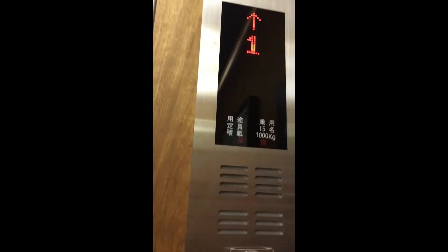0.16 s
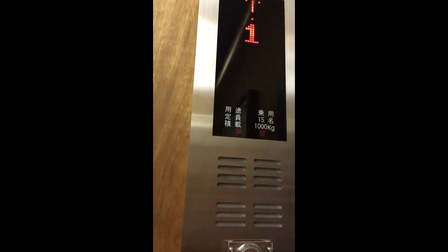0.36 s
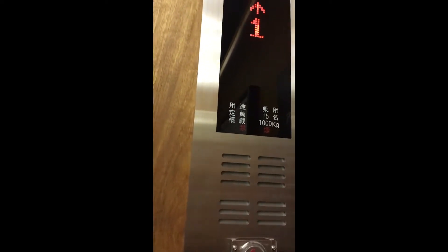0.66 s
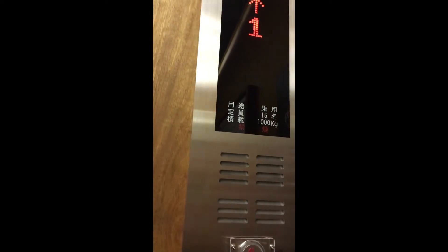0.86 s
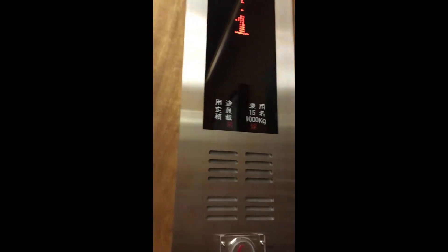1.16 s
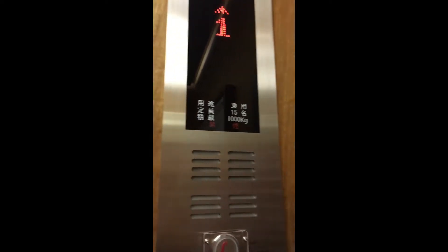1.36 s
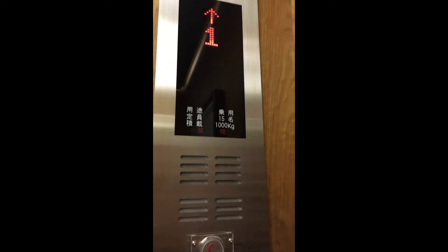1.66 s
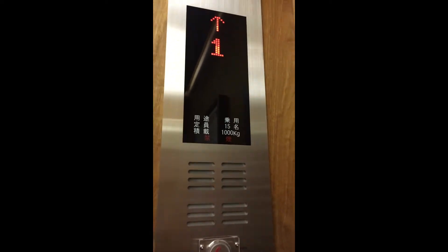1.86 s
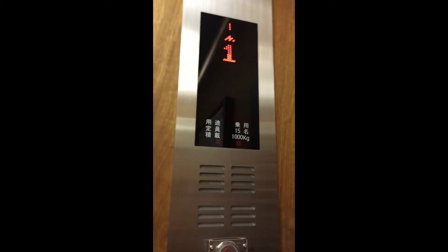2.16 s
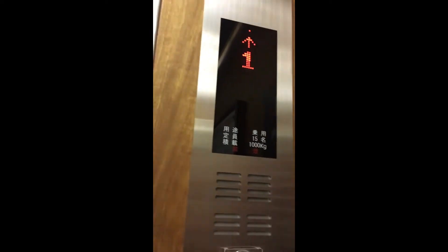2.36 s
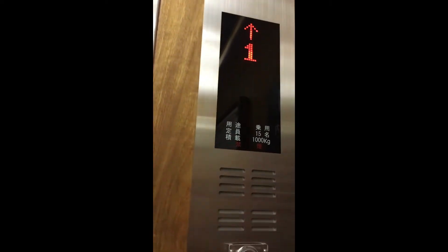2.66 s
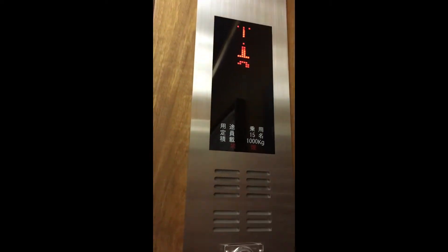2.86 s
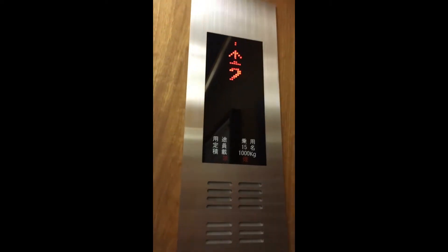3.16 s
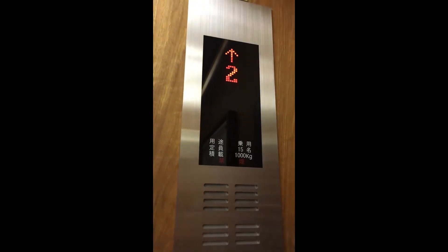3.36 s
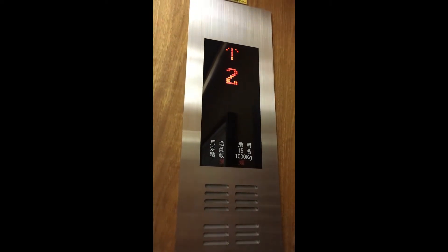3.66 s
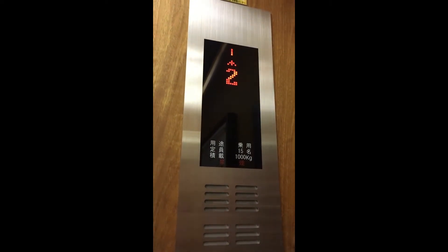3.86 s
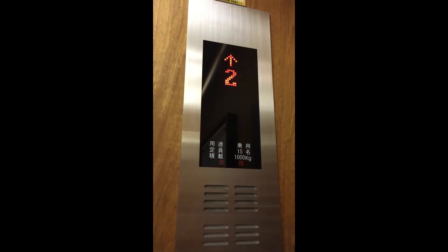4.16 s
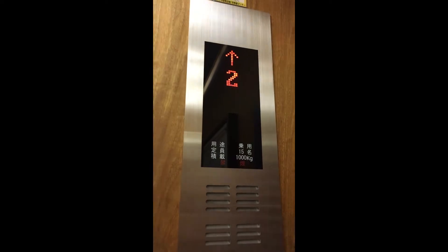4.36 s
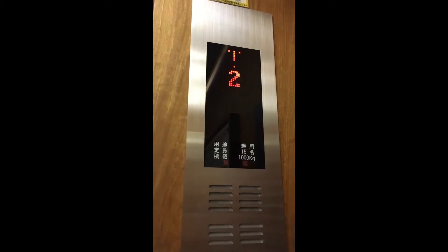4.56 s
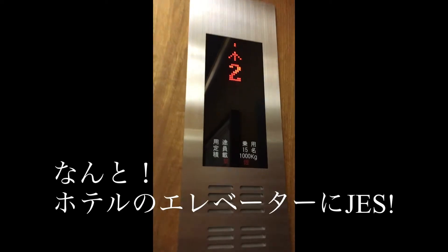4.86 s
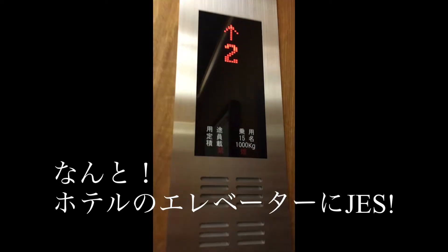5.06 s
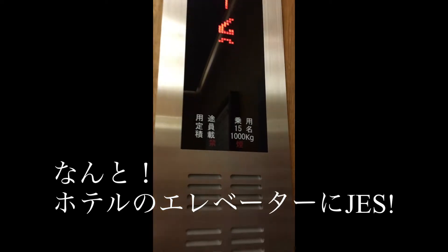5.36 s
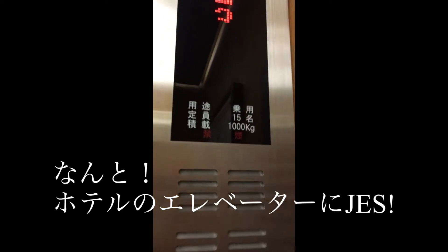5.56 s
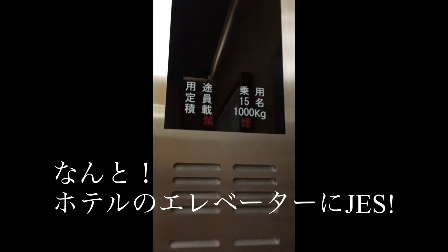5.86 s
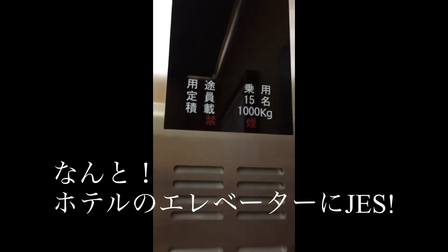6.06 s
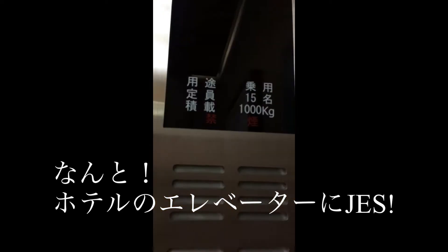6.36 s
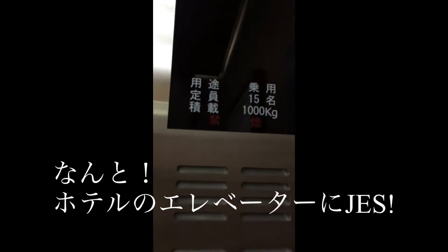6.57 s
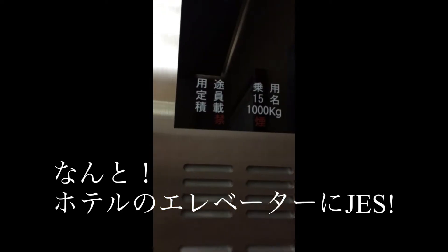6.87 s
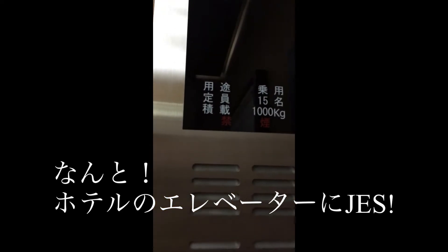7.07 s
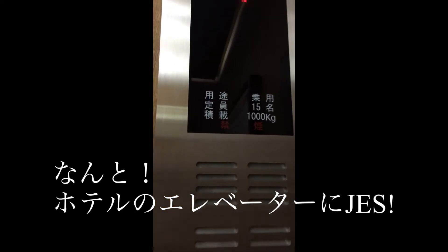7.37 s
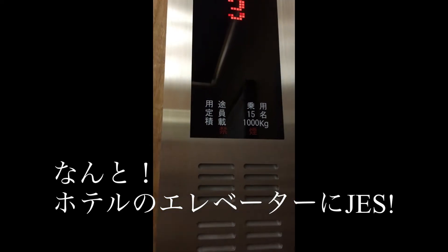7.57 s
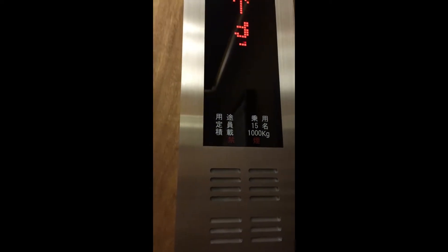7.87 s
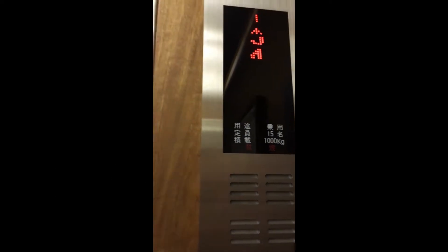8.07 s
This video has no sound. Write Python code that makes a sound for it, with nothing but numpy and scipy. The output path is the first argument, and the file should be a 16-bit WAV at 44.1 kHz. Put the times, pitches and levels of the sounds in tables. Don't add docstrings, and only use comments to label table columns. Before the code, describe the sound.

Close phone microphone inside a small metal lift car moving upward. A quiet, deep rumble wavers throughout under soft fan air. In the first second and a quarter a fingertip raps a button about eight times, short hard clicks with a brief boxy echo. A sleeve rustles softly just before two seconds. Afterwards the ride continues, its wall rattle and rail hum swelling around six to seven seconds.

```python
import sys
import numpy as np
from scipy import signal
from scipy.fft import rfft, irfft, next_fast_len
from scipy.io import wavfile
from scipy.ndimage import uniform_filter1d

SR = 44100
rng = np.random.default_rng(int(sys.argv[2]) if len(sys.argv) > 2 else 0)


def elevation(decibels):
    levels = np.asarray(decibels, float)
    return 10 ** (levels / 20)


def unload_wav(signal):
    wavfile.write(
        sys.argv[1],
        SR,
        np.round(np.clip(np.atleast_2d(signal).T, -1, 1) * 32767).astype(np.int16),
    )


N = 362442

# pitch_hz, width_hz
AIR_MODES = [(81, 10.5), (118, 15.4)]
# peak_s, level_db, half_length_s
LURCHES = [(.11, -38, 0.052), (.34, -43.5, 0.047), (.56, -43, 0.16), (.9, -41.5, .07), (1.1, -39, .1),
           (1.36, -36.5, 0.053), (1.52, -42, 0.072), (1.7, -40, .1), (1.9, -40.5, 0.069),
           (2.2, -40.5, 0.18), (2.6, -45.5, 0.072), (3.02, -41.5, 0.069), (3.13, -41, 0.026),
           (3.45, -42.5, 0.054), (3.63, -40.5, 0.032), (3.85, -37.5, 0.11), (4.12, -43, .08),
           (4.72, -38.5, 0.074), (4.99, -37, 0.077), (5.24, -43, 0.053), (5.6, -41.5, 0.23),
           (5.94, -44.5, .07), (6.16, -39.5, 0.14), (6.42, -38.5, 0.096), (6.75, -38, 0.079),
           (7.0, -43, 0.051), (7.17, -39.5, 0.035), (7.32, -38, 0.093), (7.62, -46, 0.14), (8.08, -43, 0.2)]
# peak_s, level_db, half_length_s
SHUDDERS = [(.11, -40, 0.075), (.5, -42.5, 0.14), (.89, -44, 0.15), (1.25, -44, 0.091), (1.56, -42.5, 0.2),
            (1.85, -46, 0.099), (2.17, -41.5, 0.12), (2.53, -45.5, 0.13), (2.73, -40.5, 0.054),
            (2.92, -41, 0.055), (3.25, -41.5, 0.086), (3.46, -37, 0.033), (3.65, -46, .06),
            (3.87, -40.5, .05), (4.14, -37.5, 0.087), (4.39, -38.5, 0.043), (4.6, -41, 0.19),
            (5.04, -42, 0.13), (5.29, -38.5, 0.048), (5.45, -43.5, .1), (5.85, -43, 0.25),
            (6.07, -43.5, 0.055), (6.33, -44, .07), (6.59, -40.5, 0.083), (6.95, -40.5, 0.13),
            (7.27, -40.5, 0.069), (7.44, -38, 0.051), (7.65, -43, 0.13), (7.85, -42.5, 0.087),
            (8.05, -49, 0.05)]
# pitch_hz, width_hz, level_db
LARGE_PANELS = [(175.8, 18.8, 0), (215.9, 12.3, -5.5)]
# pitch_hz, width_hz, level_db
SMALL_PANELS = [(253.9, 10, 0), (289.9, 11.2, -2.5), (319, 7.9, -6)]
# time_s, level_db
GUIDE_LOAD = [(0, -54.5), (1.2, -53.5), (1.75, -58.5), (2.5, -54), (3.2, -58.5), (3.5, -53.5), (4.1, -57),
              (4.7, -56), (5.25, -55), (5.6, -52.5), (6.04, -46), (6.36, -48), (6.85, -48), (7.15, -50),
              (7.75, -53.5), (8.22, -59)]


def car_body():
    lower_air = even_swells(LURCHES, -56.5) * evened(resonate(*AIR_MODES[0]), 0.081)
    upper_air = even_swells(SHUDDERS, -52.5) * evened(resonate(*AIR_MODES[1]), 0.068)

    load_db, = in_time(GUIDE_LOAD)
    sag_s, sag_half_s = 3.95, 1.16
    sag = np.exp(-0.5 * ((np.arange(N) / SR - sag_s) / sag_half_s) ** 2)
    large_db = -48.5 + 0.37 * (load_db - load_db.mean()) - 1 * sag
    large = elevation(large_db) * evened(mode_cluster(LARGE_PANELS), 0.27)
    small = elevation(load_db) * evened(mode_cluster(SMALL_PANELS), 0.25)
    return lower_air + upper_air + large + small


# pitch_hz, width_hz, level_db
RAIL_STRANDS = [(952, 20, 3), (974, 20, 1.5), (1017, 27, -5.5), (1054.6, 28, -1)]


def guides():
    load_db, = in_time(GUIDE_LOAD)
    hum_db = -58.5 + 0.83 * (load_db - load_db.mean())
    return elevation(hum_db) * mode_cluster(RAIL_STRANDS)


# start_s, peak_db, brightness_db, plate_ring_db
RAPS = [
    (0.127, -46, -21, 3),
    (0.326, -52, -26, -3),
    (0.383, -31, -23, 1.5),
    (0.5631, -35, -20, 5),
    (0.7273, -32, -21.5, 1.5),
    (0.896, -31, -20.5, -0.5),
    (1.0745, -31.5, -20, 2),
    (1.2455, -38.5, -26, -11),
    (6.833, -70, 1, 14),
]
# pitch_hz, level_db, fade_by_60db_s
PLATE = [(504, -8, 0.013), (684, 0, 0.013), (854, -1.5, 0.017), (970, -2.5, 0.028), (1140, -12, 0.013),
         (1324, -4.5, 0.022), (1590, -1, 0.01), (1930, -4.5, 0.02), (3460, -5.5, 0.0068),
         (3970, -14.5, 0.025), (4340, -15.5, 0.017), (6300, -22, 0.0089), (7000, -10.5, 0.0072),
         (8340, -8.5, 0.0091)]


def button():
    start_s, peak_db, bright_db, ring_db = np.transpose(RAPS)
    at = np.round(start_s * SR).astype(int)
    luck_db = 2.2 * rng.standard_normal((len(at), len(PLATE)))
    plate = np.zeros(N)
    for k, (hz, level_db, t60_s) in enumerate(PLATE):
        strike_db = peak_db + level_db - 3.0 + luck_db[:, k]
        if hz > 4800:
            strike_db = strike_db + bright_db + 20.5
        elif 3000 < hz < 4800:
            strike_db = strike_db + ring_db
        clicks = np.zeros(N)
        clicks[at] = (-1) ** k * elevation(strike_db)
        plate += ring(clicks, hz, t60_s)

    crack_db, crack_t60_s = -8, 0.015
    clicks = np.zeros(N)
    clicks[at] = elevation(peak_db + bright_db + 18.0 + crack_db)
    fade = signal.lfilter([1], [1, -elevation(-60 / (crack_t60_s * SR))], clicks)
    crack_band = signal.butter(1, [2500, 9000], "band", fs=SR, output="sos")
    return plate + signal.sosfilt(crack_band, fade * rng.standard_normal(N))


# pitch_hz, fade_by_60db_s, level_db
CAR_ECHO = [(720, 0.23, -23.5), (1430, 0.18, -24.5), (2600, 0.095, -35), (4350, 0.32, -35),
            (6800, 0.15, -39), (11000, 0.053, -38)]


def car_echo(x):
    scattered = x * (1 + 0.5 * rng.standard_normal(N))
    t = np.arange(SR // 3) / SR
    response = np.zeros(len(t))
    for hz, t60_s, level_db in CAR_ECHO:
        edges_hz = [hz / 1.22, min(hz * 1.32, 0.45 * SR)]
        band = signal.butter(1, edges_hz, "band", fs=SR, output="sos")
        noise = signal.sosfilt(band, rng.standard_normal(len(t)))
        response += elevation(level_db - 60 * t / t60_s) * noise
    build_up = 1 - np.exp(-t / 0.00085)
    return signal.fftconvolve(scattered, response * build_up)[:N]


# peak_s, level_db, rise_s, fall_s, dullness_db
STROKES = [(1.44, -77.5, 0.087, .1, 6.5), (1.57, -64, 0.07, 0.094, 2), (1.82, -55, .12, 0.16, -1),
           (2.3, -80.5, .1, .1, 1), (2.52, -74.5, .12, 0.065, 1), (2.82, -69.5, 0.073, 0.085, 3.5),
           (2.98, -79.5, .06, 0.083, 1.5), (4.75, -78.5, .08, 0.11, 0), (5.27, -81.5, 0.21, .12, 1),
           (5.8, -82.5, 0.37, 0.2, -17), (6.85, -94, 0.044, .05, -12), (7.1, -85, 0.051, .07, -8),
           (7.45, -89, .15, 0.26, -5)]
# pitch_hz, level_db (per Hz)
CLOTH_COLOUR = [(410, -33), (700, 0), (788, -9), (946, -1.5), (1660, -6.5), (2000, -3), (2370, -4.5),
                (3410, -8.5), (4100, -7.5), (8880, -7.5), (10400, -13), (12600, -11.5), (16000, -19)]


def sleeve():
    peak_s, level_db, rise_s, fall_s, dull_db = np.transpose(STROKES)
    rest_db, rest_dull_db = -86, 4.5
    bright = heaped(swells(peak_s, level_db, rise_s, fall_s), rest_db)
    dull = heaped(swells(peak_s, level_db + dull_db, rise_s, fall_s), rest_db + rest_dull_db)

    cloth = coloured(CLOTH_COLOUR)
    low = signal.sosfiltfilt(signal.butter(1, 3520, fs=SR, output="sos"), cloth)
    top = signal.sosfiltfilt(signal.butter(1, 10000, "high", fs=SR, output="sos"), cloth)
    top_loss = 0.36 * np.exp(-np.log(bright / elevation(-63)) ** 2)
    rustle = bright * (cloth - low - top_loss * top) + dull * low
    return elevation(13.5 + 0.73 * drift(11)) * rustle


# pitch_hz, level_db (per Hz)
FAN_COLOUR = [(13, -67), (22, -8.5), (64, -1), (128, -1.5), (152, -9), (347, -12.5), (510, -16.5),
              (554, -18.5), (730, -17.5), (1130, -24.5), (1410, -24), (4500, -44.5), (9480, -65),
              (10300, -71), (16000, -58)]
# pitch_hz, width_hz, level_db, change_near_panel_db
DUCT = [(29.7, 39, -56, 0), (55.3, 24, -55.5, 2), (351.5, 13.7, -57, -3.5), (410.3, 29, -62.5, -6.5),
        (501, 69, -65, -3.5), (618.8, 30.5, -60, -1.5), (688, 25, -67.5, 5), (747.5, 23, -62, -5.5),
        (882, 44, -68, -1), (1448.5, 31, -67, -2.5), (1763, 40, -77.5, 2), (2033, 28, -72, -2),
        (2212, 123, -68.5, 0.5), (2514, 67, -72.5, -2), (3420, 450, -78, -4)]
# time_s, share (0-1)
LEAN = [(0, 0.2), (5.25, 0.0), (5.6, 1.0), (7.8, 1.0), (8.22, 0.7)]


def fan():
    lean, = in_time(LEAN)
    out = elevation(-46 + 1.4 * drift(2.64)) * coloured(FAN_COLOUR)
    for hz, width_hz, level_db, near_db in DUCT:
        gain = elevation(level_db + near_db * lean + 1.5 * drift(1.0))
        out += gain * evened(resonate(hz, width_hz), 0.36)
    return out


# peak_s, level_db, half_length_s
CRESTS = [(.56, -75, .08), (.84, -75, .04), (1.0, -73, .06), (1.4, -82, .05), (1.8, -90, 0.17),
          (2.1, -77, .15), (2.84, -80, .1), (3.15, -80, .1), (3.43, -77, .07), (3.7, -75, 0.086),
          (3.98, -72.5, 0.071), (4.2, -75, 0.082), (4.47, -75, 0.067), (4.85, -76, .07), (5.0, -75, .12),
          (5.6, -77, 0.16), (5.82, -79, .06), (6.15, -78, 0.14), (6.52, -75.5, .1), (6.75, -74, 0.072),
          (6.96, -72, 0.042), (7.43, -77, 0.19), (7.6, -75.5, 0.063), (7.93, -71.5, 0.098)]
# time_s, spread_hz
SPREAD = [(0, 15), (1.5, 25), (3.5, 55), (5.5, 60), (7, 35), (8.22, 22)]


def inverter():
    spread_hz, = in_time(SPREAD)
    phase = 2 * np.pi * np.cumsum(10046 + 2 * drift(5.7)) / SR
    wobble = 2 * np.pi * np.cumsum(spread_hz * drift(90)) / SR
    whine = even_swells(CRESTS, -89) * np.sin(phase)
    skirt = elevation(-82.5) * np.sin(phase + wobble)
    return np.sqrt(2) * (whine + skirt)


def rms_one(x):
    return x / np.sqrt(np.mean(x ** 2) + 1e-20)


def in_time(rows):
    time_s, *columns = np.transpose(rows)
    return [np.interp(np.arange(N) / SR, time_s, column) for column in columns]


def drift(rate):
    r = np.exp(-80 * np.pi * rate / SR)
    slow = signal.lfilter([1], [1, -2 * r, r * r], rng.standard_normal(N // 40 + 2002))[2000:]
    return np.interp(np.arange(N) / 40, np.arange(len(slow)), rms_one(slow))


def coloured(points):
    size = next_fast_len(N)
    hz, level_db = np.transpose(points)
    bins_hz = np.maximum(np.arange(size // 2 + 1) * SR / size, 1)
    gain = elevation(np.interp(np.log(bins_hz), np.log(hz), level_db))
    return rms_one(irfft(rfft(rng.standard_normal(size)) * gain, size)[:N])


def resonate(hz, width_hz):
    r = np.exp(-np.pi * 1.5 * width_hz / SR)
    stage = [1, 0, -1, 1, -2 * r * np.cos(2 * np.pi * hz / SR), r * r]
    noise = rng.standard_normal(N + SR // 4)
    return rms_one(signal.sosfilt([stage, stage], noise)[-N:])


def mode_cluster(modes):
    return rms_one(sum(elevation(db + 2.05 * drift(2.06)) * resonate(hz, width_hz) for hz, width_hz, db in modes))


def evened(x, seconds):
    return rms_one(x / np.sqrt(uniform_filter1d(x ** 2, int(seconds * SR)) + 0.031))


def ring(clicks, hz, t60_s):
    r = elevation(-60 / (t60_s * SR))
    w = 2 * np.pi * hz / SR
    return signal.lfilter([0, np.sin(w)], [1, -2 * r * np.cos(w), r * r], clicks + 1e-18)


def swells(peak_s, level_db, rise_s, fall_s):
    t = np.arange(0, N + 64, 64) / SR - np.asarray(peak_s)[:, None]
    half_s = np.where(t < 0, rise_s[:, None], fall_s[:, None])
    return elevation(level_db)[:, None] * np.exp(-0.5 * (t / half_s) ** 2)


def heaped(gains, rest_db):
    total = np.sqrt(np.sum(gains ** 2, axis=0) + elevation(rest_db) ** 2)
    return np.interp(np.arange(N) / 64, np.arange(len(total)), total)


def even_swells(rows, rest_db):
    peak_s, level_db, half_s = np.transpose(rows)
    return heaped(swells(peak_s, level_db, half_s, half_s), rest_db)


def scene():
    raps = button()
    mix = car_body() + guides() + raps + car_echo(raps) + sleeve() + fan() + inverter()
    return mix[None]


def roll_off(x):
    return signal.sosfilt(signal.butter(12, 16470, fs=SR, output="sos"), x)


# pitch_hz, width_hz, depth (0-1)
MIC_DIPS = [(4820, 340, 0.4), (7760, 1700, 0.35), (10600, 120, 0)]


def record(dry):
    for hz, width_hz, depth in MIC_DIPS:
        r = np.exp(-np.pi * width_hz / SR)
        poles = [1, -2 * r * np.cos(2 * np.pi * hz / SR), r * r]
        peak = signal.lfilter([(1 - r * r) / 2, 0, (r * r - 1) / 2], poles, dry)
        dry = dry - np.clip(depth, 0, 1) * peak
    top_cut = signal.ellip(12, 0.5, 60, 15740, fs=SR, output="sos")
    mix = signal.sosfilt(top_cut, dry)
    return roll_off(mix)


dry = scene()
out = record(dry)
unload_wav(out)
```